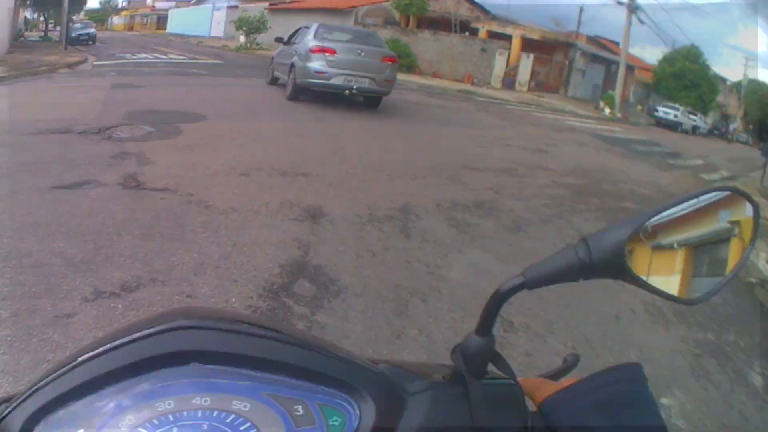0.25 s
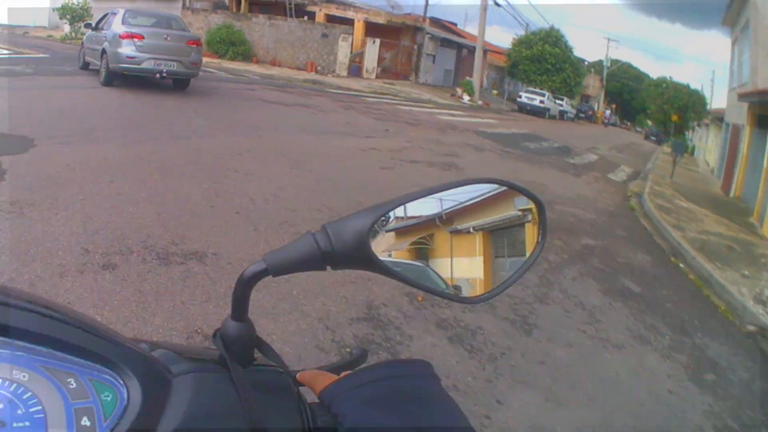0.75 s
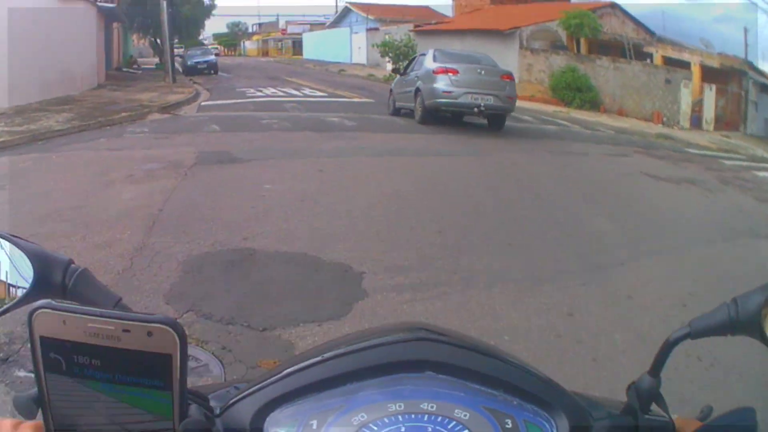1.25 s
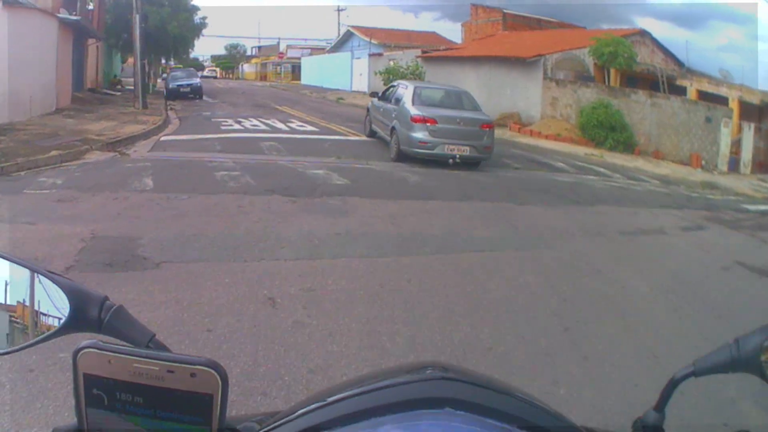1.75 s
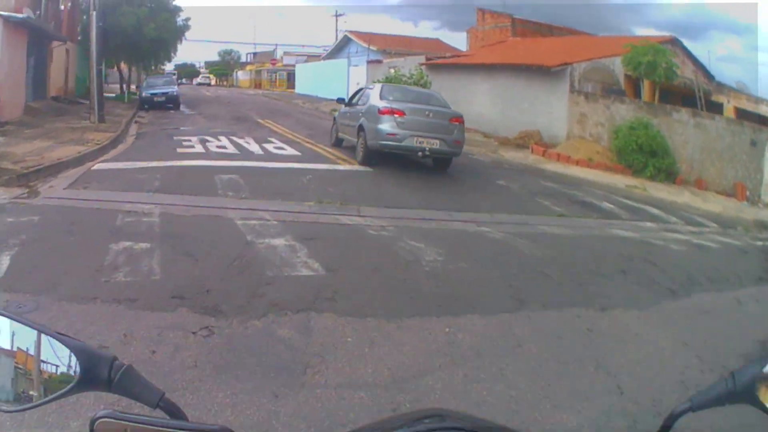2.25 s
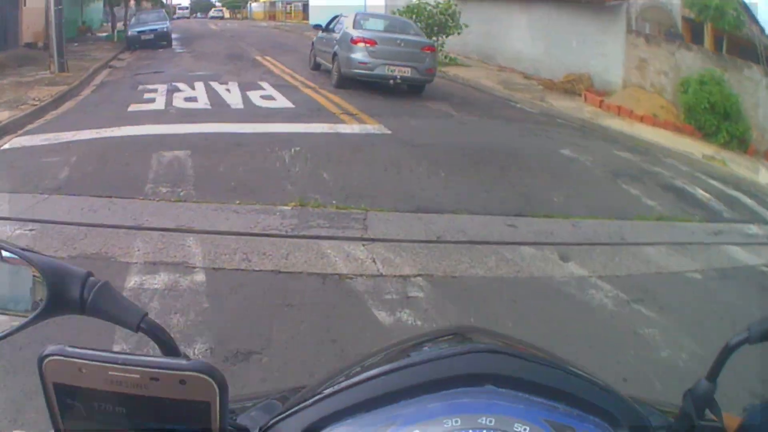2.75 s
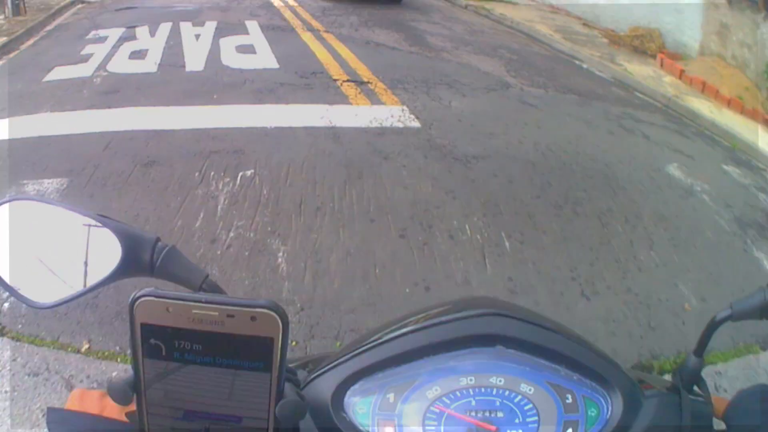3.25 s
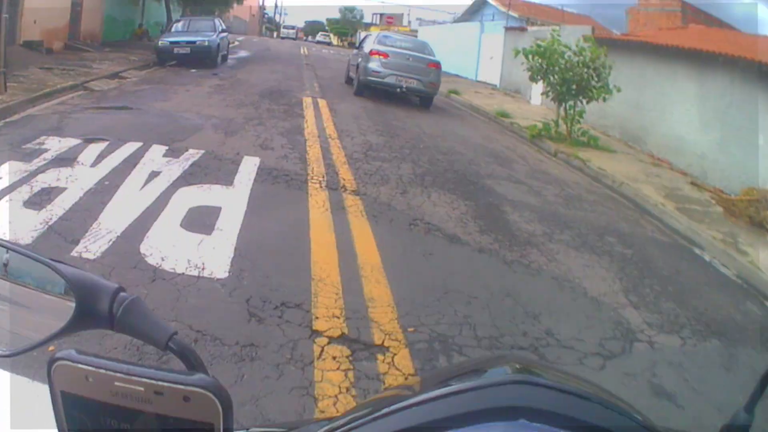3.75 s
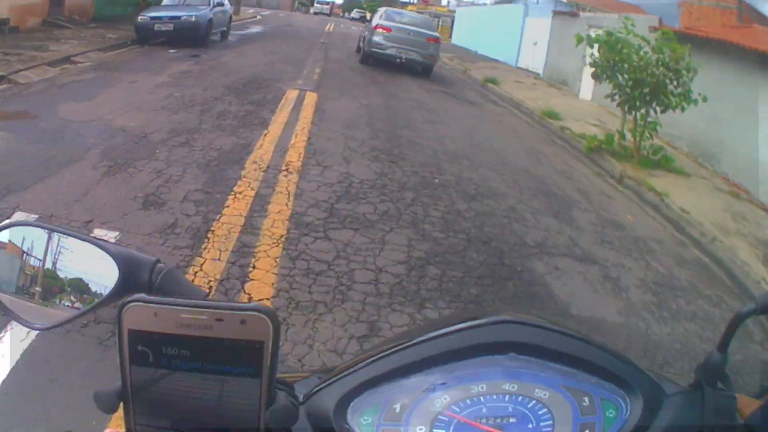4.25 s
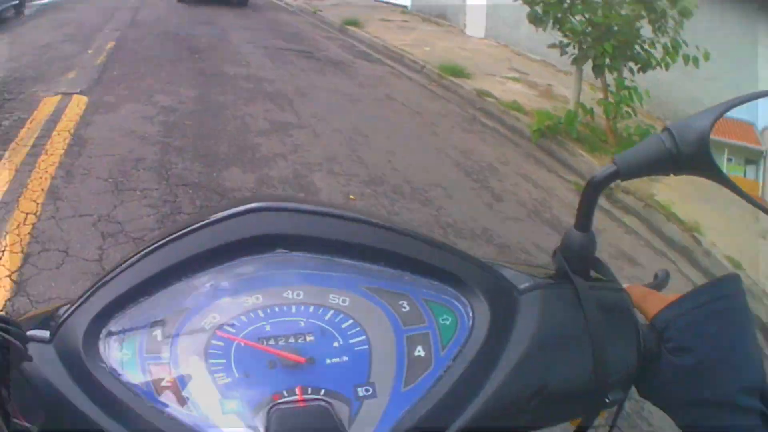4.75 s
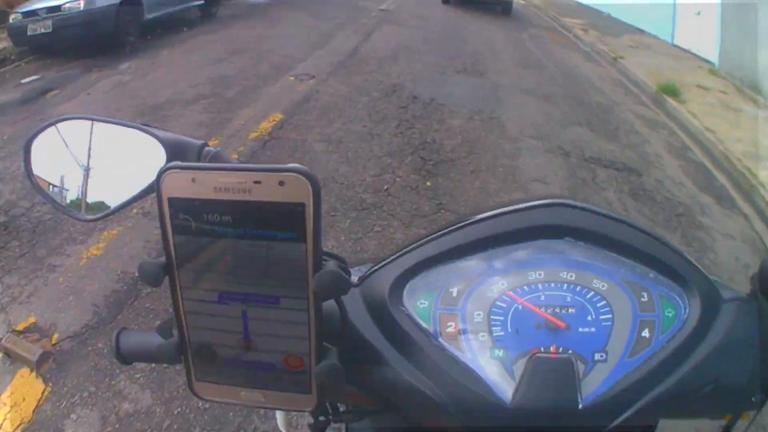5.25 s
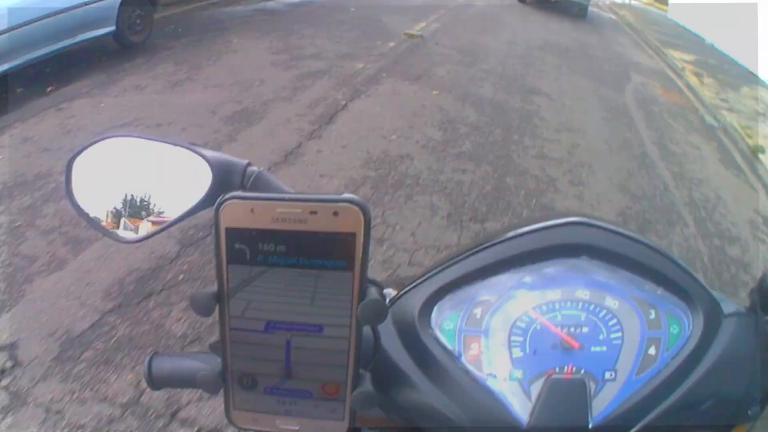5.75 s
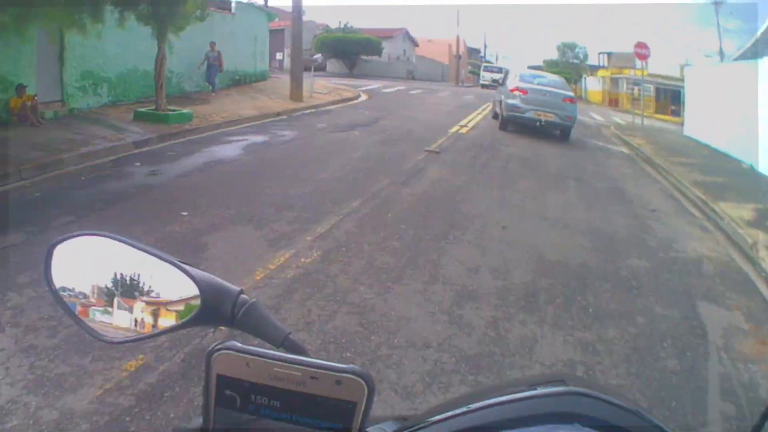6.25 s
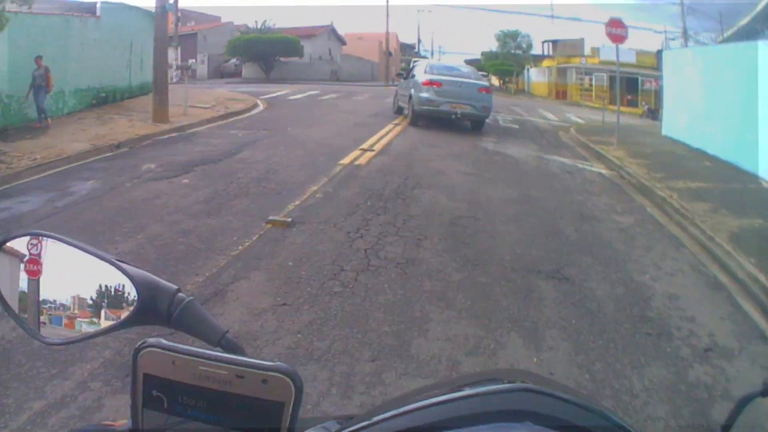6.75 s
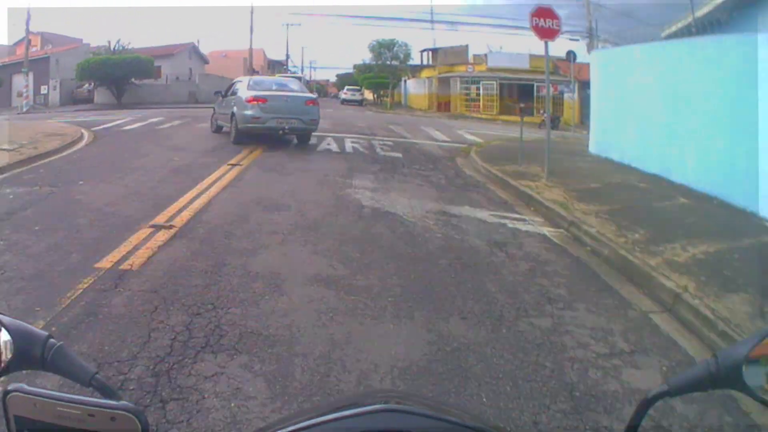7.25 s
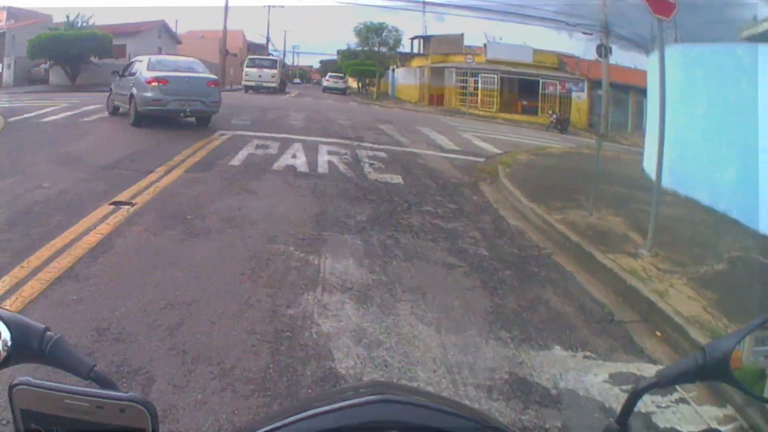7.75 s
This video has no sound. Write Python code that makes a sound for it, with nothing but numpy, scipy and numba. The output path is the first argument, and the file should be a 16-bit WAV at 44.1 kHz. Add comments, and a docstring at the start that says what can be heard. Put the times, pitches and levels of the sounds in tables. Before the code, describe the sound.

Close, dry onboard sound from the seat of a small single-cylinder four-stroke scooter. From 0 to 1.6 s it pulls on part throttle, a throaty, honking flutter of about 28 beats a second, rising slightly, with a brief gear whine near 1.1 s. From 1.8 s the throttle nearly closes and the sound drops to a softer, hollow exhaust putter. At 3.1 s a short dull knock marks a gutter, followed by a throttle blip and a faint spit of grit near 3.5 s. Pitch and loudness then climb to about 45 beats a second at 5.5 s, with nasal intake bark and whine. It shuts abruptly, slowing into uneven burbles around 6.0-6.2 s with a tiny grit tick. A light, steady cruise follows from 6.3 s, easing off at 7.3 s with irregular pops. Tyre rush, chain rasp, thin hiss and metallic valve rattle continue throughout.

```python
"""A small single-cylinder four-stroke scooter, heard from the rider's seat for eight seconds along a street.
It pulls on a part-open throttle, shuts off from 1.8 s and knocks over a gutter at 3.1 s; then it revs up
to a near-full throttle at 5.5 s, shuts, takes a light cruise from 6.3 s and shuts again at 7.3 s.
One crank phase times resonant exhaust snaps and booms, airbox honks and barks, a sine gear whine and
valve rattle; shaped noise makes tyre rush, chain rasp, hiss and two spits of grit."""
import sys
import numpy as np
from scipy import signal
from scipy.fft import rfft, irfft, next_fast_len
from scipy.io import wavfile
from scipy.ndimage import uniform_filter1d, map_coordinates
from numba import njit

SR = 44100
rng = np.random.default_rng(int(sys.argv[2]) if len(sys.argv) > 2 else 0)


def materialize(psi):
    """Save the field psi as 16-bit PCM at rate SR to the path in sys.argv[1].

    A 1-D psi becomes a single channel; in a 2-D psi each row is a channel.
    """
    bounded = np.clip(np.atleast_2d(psi).T, -1, 1)
    quanta = np.round(bounded * 32767).astype(np.int16)
    wavfile.write(sys.argv[1], SR, quanta)


N = 352359
TIME = np.arange(N) / SR

# weak and strong burns on a shut throttle: (time [s], level against that firing's own size [dB])
ODD_BURNS = [(2.82, -13.5), (3.03, -7.5), (3.07, -8.5), (6.04, 8), (6.18, -10.5), (6.25, 0), (7.37, -5),
             (7.47, -1), (7.51, -8), (7.61, -6.5), (7.65, 10), (7.71, -10)]


def from_db(db):
    """Decibels to gain."""
    return 10 ** (np.asarray(db) / 20)


def in_time(rows):
    """The columns of a curve, at every sample."""
    s, *columns = np.transpose(rows)
    return [np.interp(TIME, s, c) for c in columns]


def rms_one(x):
    """Scale to unit power."""
    return x / np.sqrt(np.mean(x ** 2) + 1e-20)


def levelled(x):
    """Even out the power over a few engine cycles; the single beats stay."""
    power = uniform_filter1d(uniform_filter1d(x ** 2, size=4400), size=3000)
    return x / np.sqrt(np.maximum(power, 1e-20))


def noise(spectrum):
    """Noise of the given colour, rms 1."""
    size = next_fast_len(N)
    hz, db = np.transpose(spectrum)
    bins = np.maximum(np.fft.rfftfreq(size, 1 / SR), 1)
    gain = from_db(np.interp(np.log(bins), np.log(hz), db))
    gain = gain * (bins > hz[0] / 2) * (bins < hz[-1] * 2)
    white = rfft(rng.standard_normal(size))
    return rms_one(irfft(white * gain, size)[:N])


def drift(rate):
    """A smooth random wander with this many knots per second, rms 1."""
    knots = rng.standard_normal(4096)
    return rms_one(map_coordinates(knots, [TIME * rate], order=3, mode="wrap"))


def resonate(x, hz, width_hz):
    """One resonance with gain 1 on top."""
    r = np.exp(-np.pi * width_hz / SR)
    zeros = (1 - r * r) / 2 * np.array([1, 0, -1])
    poles = [1, -2 * r * np.cos(2 * np.pi * hz / SR), r * r]
    return signal.lfilter(zeros, poles, x + 1e-18)


def body(x, modes):
    """Resonances side by side, signs alternating."""
    return sum((-1) ** k * from_db(db) * resonate(x, hz, width) for k, (hz, width, db) in enumerate(modes))


@njit
def sweep(x, angle, r):
    """A resonance whose centre moves: angle in radians per sample, r the decay per sample."""
    out, state = np.zeros(len(x)), 0j
    for i in range(len(x)):
        state = state * r * np.exp(1j * angle[i]) + x[i]
        out[i] = state.real
    return out


def band(x, low_hz, high_hz, order):
    """Causal band-pass."""
    return signal.sosfilt(signal.butter(order, [low_hz, high_hz], "band", fs=SR, output="sos"), x)


def pulses(cycles, phase, spread_db, odd_burns=(), jitter_s=.00004):
    """One click each time the engine passes this point of its cycle, each a little different."""
    at = np.flatnonzero(np.diff(np.floor(cycles - phase)) > 0)
    chance = rng.standard_normal((400, 2))[:len(at)]
    sizes_db = np.broadcast_to(spread_db, N)[at] * chance[:, 0]
    for s, db in odd_burns:
        sizes_db[np.argmin(np.abs(at / SR - s))] += db
    jitter = np.round(jitter_s * SR * chance[:, 1]).astype(int)
    out = np.zeros(N)
    out[np.clip(at + jitter, 0, N - 1)] = from_db(sizes_db)
    return out


def bursts(cycles, phase, length):
    """An envelope that jumps at this point of each cycle and decays over this share of it."""
    return np.exp(-((cycles - phase) % 1) / length)


def running(cycles, rush_db, rasp_db, hiss_db):
    """Broad noise of the tyres rushes; the chain rasps and hisses with each tug of the engine."""
    # noise colours of tyres, chain and hiss: (frequency [Hz], relative density [dB per Hz])
    rush_colour = [(25, -18.5), (60, -5.5), (120, 7.5), (300, 13), (450, 3), (700, 0.5), (1080, -1.5),
                   (1300, -9.5), (1500, -7), (2000, -18.5), (3000, -49)]
    rasp_colour = [(700, -28), (1400, -5.5), (2200, -2), (2600, -4.5), (3000, -11.5), (3400, -20.5),
                   (3900, -31), (5000, -41.5)]
    hiss_colour = [(2500, -19.5), (4000, 0.5), (5500, 1.5), (6800, -0.5), (8200, 1.5), (9500, -3),
                   (10600, 1), (12500, -11.5), (14500, -13), (16000, -8)]
    tug = rms_one(1 + 0.41 * bursts(cycles, phase=0.064, length=0.13))
    rush = from_db(rush_db + 0.25 * drift(23)) * noise(rush_colour)
    rasp = from_db(rasp_db + 1.2 * drift(120)) * noise(rasp_colour)
    hiss = from_db(hiss_db + 1.1 * drift(200)) * noise(hiss_colour)
    return rush + tug * (rasp + hiss)


def road(cycles, throttle):
    """Tyres and hiss follow a share of the swing in the chain's rasp; throttle lifts the tyres slightly."""
    # rasp from chain and road, ahead of a 1 dB lift: (time [s], level [dB])
    chain_curve = [(0, -49.5), (0.549, -50.5), (1.548, -45), (1.918, -50.5), (3.098, -49), (3.448, -39.5),
                   (4.601, -46), (5.47, -43.5), (6.142, -52.5), (6.431, -46.5), (8, -45)]
    (chain_db,) = in_time(chain_curve)
    swing_db = chain_db - chain_db.mean()
    rush_db = -29 + 0.88 * swing_db + 1 * throttle
    hiss_db = -68 + .7 * swing_db
    return running(cycles, rush_db, chain_db + 1, hiss_db)


def grit():
    """Grit spits off the tyres: each spit is a short swell of thin crackle."""
    # (time [s], swell length to 1/e on either side [s], level of the crackle's rms at the peak [dB])
    spits = [(3.478, .025, -63), (5.968, .005, -61)]
    crackle = rms_one(band(rng.standard_normal(N) ** 3, low_hz=3800, high_hz=6500, order=2))
    return crackle * sum(from_db(db) * np.exp(-((TIME - s) / length) ** 2) for s, length, db in spits)


def knocks():
    """A bump over the gutter shakes the frame: a short, dull scuffle into its modes."""
    # (time [s], peak level [dB])
    bumps = [(3.111, -18.5)]
    # modes of the frame: (frequency [Hz], width [Hz], relative level [dB])
    frame_modes = [(920, 50, -13), (990, 130, 7), (1190, 28, 1)]
    out = np.zeros(N)
    for s, db in bumps:
        scuffle = rng.standard_normal(N) * (TIME >= s) * np.exp(-np.abs(TIME - s) / 0.0024)
        ring = band(body(scuffle, frame_modes), low_hz=700, high_hz=1510, order=3)
        out += from_db(db) * ring / np.abs(ring).max()
    return out


def valve_gear(cycles):
    """Piston and tappets rattle the casing twice a cycle, over a steady stir."""
    # ring of the casing, ahead of a 3.5 dB cut: (time [s], level [dB])
    ring_curve = [(0, -43), (.7, -45), (1.1, -36), (3.051, -41), (3.301, -36), (4.101, -35), (4.598, -41.5),
                  (5.502, -38.5), (8, -35.5)]
    # modes of the casing: (frequency [Hz], width [Hz], relative level [dB])
    casing_modes = [(1693, 24, -1), (1797.5, 20, 2.5), (2022, 140, -2), (2086, 95, -1.5)]
    (casing_db,) = in_time(ring_curve)
    rattle = 0.32 + bursts(cycles, phase=0.073, length=0.037) + 0.17 * bursts(cycles, phase=1.0, length=0.081)
    ring = body(rng.standard_normal(N) * rattle * from_db(0.21 * drift(50)), casing_modes)
    return from_db(casing_db - 3.5) * rms_one(band(ring, low_hz=1290, high_hz=2430, order=2))


def whine_level():
    """Each whine under load swells, holds and fades back to a faint resting tone."""
    # spells in which the primary gear sings out: (start [s], end [s], level [dB])
    spells = [(.95, 1.35, -37), (3.527, 4.254, -38), (4.88, 5.5, -38)]
    rest_db, fade_db_per_s = -49.5, 51.5
    swells = [db - fade_db_per_s * np.abs(TIME - np.clip(TIME, start, end)) for start, end, db in spells]
    return np.maximum(np.max(swells, axis=0), rest_db)


def gear(cycles, octave_db=-24.0, surge_rad=0.88, wander_rad=0.99):
    """The teeth mesh in step with the crank, whose surge in each cycle spreads the whine into side tones."""
    teeth_per_cycle = 34
    mesh = 2 * np.pi * teeth_per_cycle * cycles
    mesh = mesh + surge_rad * np.sin(2 * np.pi * cycles) + wander_rad * drift(40)
    tones = np.sin(mesh) + from_db(octave_db) * np.sin(2 * mesh)
    return np.sqrt(2) * from_db(whine_level() + drift(17)) * tones


def airbox_wall(cycles, honk_db, wall_hz=350.0, width_hz=36.0):
    """The plastic wall of the airbox hums near the honk's pitch and follows a share of its swing."""
    gulps = pulses(cycles, phase=0.361, spread_db=.3, jitter_s=.00002)
    hum = resonate(resonate(gulps, wall_hz, width_hz), wall_hz, width_hz)
    return from_db(-24.5 + 0.56 * honk_db) * levelled(hum)


def intake(cycles, honk_db, hz, sag, phase=0.2986, plenum_width_hz=58.0, snorkel_width_hz=42.3):
    """The piston gulps air: the airbox rings, low while the valve is open, sliding up as it shuts."""
    gulps = pulses(cycles, phase, spread_db=.15, jitter_s=.00002)
    angle = 2 * np.pi * hz * (1 - sag * bursts(cycles, phase, length=0.3)) / SR
    plenum = sweep(gulps, angle * 0.98, np.exp(-np.pi * plenum_width_hz / SR))
    snorkel = sweep(plenum, angle, np.exp(-np.pi * snorkel_width_hz / SR))
    honk = band(snorkel, low_hz=144, high_hz=409, order=4)
    return from_db(honk_db - 4.0) * levelled(honk) + airbox_wall(cycles, honk_db)


def bark(cycles, throttle, speed):
    """As the throttle opens and the revs rise, the sharp edge of each gulp gets out through the throat."""
    # modes of the open throat: (frequency [Hz], width [Hz], relative level [dB])
    throat_modes = [(422, 18, 4), (594, 91, -1), (756, 120, -5), (1100, 140, -12), (1690, 330, -15.5)]
    open_db, shut_db = -29, -86   # at full throttle and shut, both at the reference speed
    db_per_octave = 24.5   # the bark hardens as the engine revs up
    reference_per_s = 42   # firings per second
    gulps = pulses(cycles, phase=.31, spread_db=.3, jitter_s=.00002)
    edge = band(body(gulps, throat_modes), low_hz=330, high_hz=1980, order=3)
    level_db = shut_db + throttle * (open_db - shut_db) + db_per_octave * np.log2(speed / reference_per_s)
    return from_db(level_db) * levelled(edge)


def tailpipe(cycles, snap_db, echo_s=.0072):
    """The exhaust valve opens with a snap that runs twice more along the pipe."""
    # modes of the pipe: (frequency [Hz], width [Hz], relative level [dB])
    pipe_modes = [(324, 33, 3), (482.6, 31.6, 8), (647, 61, 0), (823, 96, -10), (1111, 150, -19)]
    blows = pulses(cycles, phase=-.06, spread_db=.5, odd_burns=ODD_BURNS, jitter_s=.00002)
    passes_db = [0, -9.5, -20.5]
    echoes = [from_db(db) * np.roll(blows, round(k * echo_s * SR)) for k, db in enumerate(passes_db)]
    # a little turbulent gas follows each blow
    gas = from_db(-23) * rms_one(rng.standard_normal(N) * bursts(cycles, phase=0, length=.5))
    flow = rms_one(sum(echoes)) + gas
    ring = band(body(flow, pipe_modes), low_hz=330, high_hz=1440, order=2)
    edge = from_db(-21.5) * band(flow, low_hz=1440, high_hz=1710, order=3)
    return from_db(snap_db - 7.5) * levelled(ring + edge)


def burn(throttle, octaves):
    """Hot gas under load tunes the silencer up, as do revs: its pitch in Hz and the firing spread in dB."""
    clean_opening = 0.24   # throttle opening from which the burn is fully hot
    cool_hz, hot_hz, hz_per_octave = 132.6, 172.4, 16   # the pitches are those at cruise speed
    cool_spread_db, hot_spread_db = 2.1, -1.6   # the sign only flips the chance: most even in between
    heat = np.clip(throttle / clean_opening, 0, 1)
    hz = cool_hz + heat * (hot_hz - cool_hz) + hz_per_octave * octaves
    return hz, cool_spread_db + heat * (hot_spread_db - cool_spread_db)


def silencer(cycles, thud_db, boom_db, hz, spread_db, width_hz=39.5, chamber_width_hz=40.7):
    """Each blow swells through two chambers tuned by the gas heat; the gas slug itself thuds below them."""
    blows = pulses(cycles, phase=-.17, spread_db=spread_db, odd_burns=ODD_BURNS)
    angle = 2 * np.pi * hz / SR
    first = sweep(blows, angle * 0.85, np.exp(-np.pi * chamber_width_hz / SR))
    second = sweep(first, angle, np.exp(-np.pi * width_hz / SR))
    boom = band(second, low_hz=86, high_hz=358, order=2)
    thud = band(resonate(blows, hz=92.0, width_hz=62.0), low_hz=55.3, high_hz=111, order=2)
    return from_db(boom_db) * levelled(boom) + from_db(thud_db - 0.5) * levelled(thud)


def at_opening(throttle):
    """The engine's voice between the throttle settings."""
    # settings ahead of each source's trim and rev gain: (opening [0-1], low thud [dB], silencer boom [dB],
    # airbox honk [dB], exhaust snap [dB], honk pitch [Hz], share by which each honk starts flat [0-1])
    voice = [(0, -25, -22.5, -42.5, -39.5, 335, .15), (0.252, -41.5, -21, -35.5, -26, 357, .2),
             (.5, -37, -19, -14, -26.5, 313.2, .2), (.75, -34.5, -19.5, -8, -21.5, 318, 0.42),
             (1.001, -27.5, -29, -7, -26.5, 312, .15)]
    opening, *columns = np.transpose(voice)
    return [np.interp(throttle, opening, c) for c in columns]


def scene():
    """Everything turns with the one crankshaft; throttle and speed set the strength of the engine's voices."""
    # engine speed: (time [s], rate [firings per s])
    speed_curve = [(0.0, 27.71), (0.5, 29.35), (0.84, 27.29), (1.22, 29.49), (1.65, 33.56), (2.05, 28.25),
                   (2.2, 31.31), (2.82, 28.42), (3.14, 26.26), (3.38, 35.6), (3.68, 30.84), (3.78, 32.4),
                   (4.15, 34.68), (4.58, 39.21), (4.7, 39.24), (5.46, 44.69), (5.85, 37.28), (6.17, 27.67),
                   (6.36, 34.55), (6.51, 30.71), (7.24, 31.29), (7.51, 27.85), (7.69, 30.5), (8.0, 28.7)]
    # the rider's hand: part open, shut for the gutter, wide open, shut, a light cruise, shut:
    # (time [s], opening [0-1])
    hand_curve = [(0, 0.54), (0.579, 0.64), (0.848, 0.61), (1.36, 0.57), (1.68, 0.39), (1.822, 0.12),
                  (2.5, 0.14), (3.08, 0.1), (3.2, 0.41), (3.42, 0.49), (3.6, 0.46), (3.711, 0.71),
                  (4.251, 0.75), (4.451, 0.91), (5.479, 0.94), (5.569, .16), (6.22, 0.03), (6.318, 0.19),
                  (7.281, 0.42), (7.429, 0.11)]
    cruise_per_s = 30   # firings per second
    (speed,), (throttle,) = in_time(speed_curve), in_time(hand_curve)
    cycles = np.cumsum(speed) / SR - .48
    octaves = np.log2(speed / cruise_per_s)
    thud_db, boom_db, honk_db, snap_db, honk_hz, honk_sag = at_opening(throttle)
    silencer_hz, spread_db = burn(throttle, octaves)

    # the boom swells later in the cycle as the throttle opens: 0.2 cycles at full throttle
    boom_cycles = cycles - 0.2 * throttle
    # boom and snap gain 3.5 and 7 dB per octave of engine speed, from the cruise
    exhaust = silencer(boom_cycles, thud_db, boom_db + 3.5 * octaves, silencer_hz, spread_db)
    exhaust = exhaust + tailpipe(cycles, snap_db + 7 * octaves)
    machinery = gear(cycles) + valve_gear(cycles)
    street = road(cycles, throttle)
    air = intake(cycles, honk_db, honk_hz, honk_sag) + bark(cycles, throttle, speed)
    return (exhaust + air + machinery + street + knocks() + grit())[None]


def record(dry, ceiling=0.7):
    """At the microphone the loudest swings are rounded off, the ends eased and the top cut steeply."""
    cutoff_hz = 15700
    rounded = dry / (1 + (dry / ceiling) ** 6) ** (1 / 6)
    eased = rounded * np.minimum(1, np.minimum(TIME, TIME[::-1]) / .004)
    return signal.sosfilt(signal.ellip(10, .1, 80, cutoff_hz, fs=SR, output="sos"), eased)


dry = scene()
out = record(dry)
materialize(out)
```